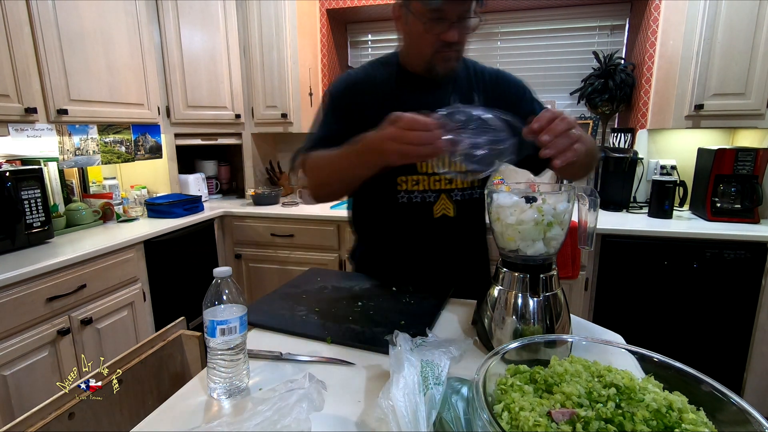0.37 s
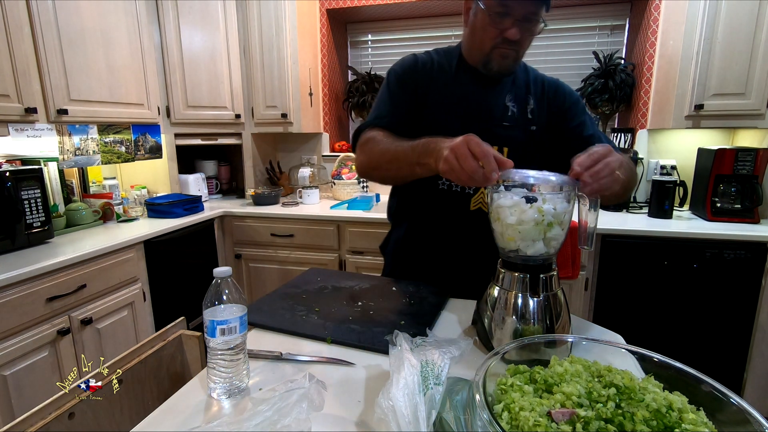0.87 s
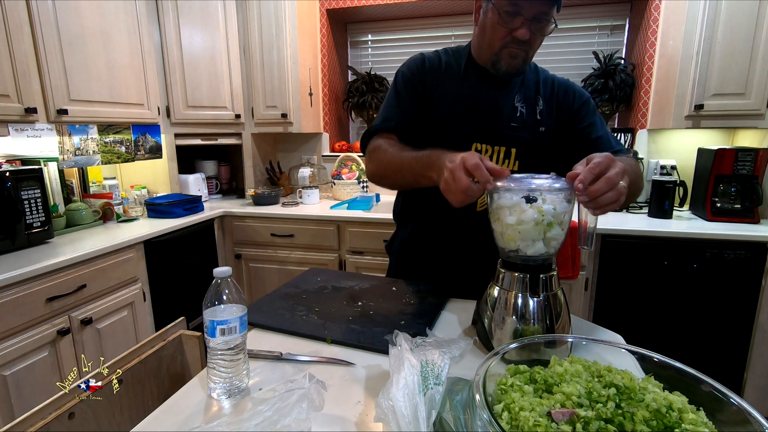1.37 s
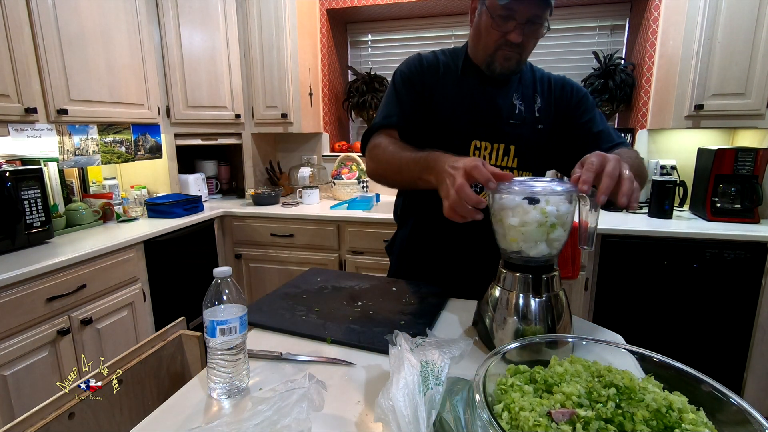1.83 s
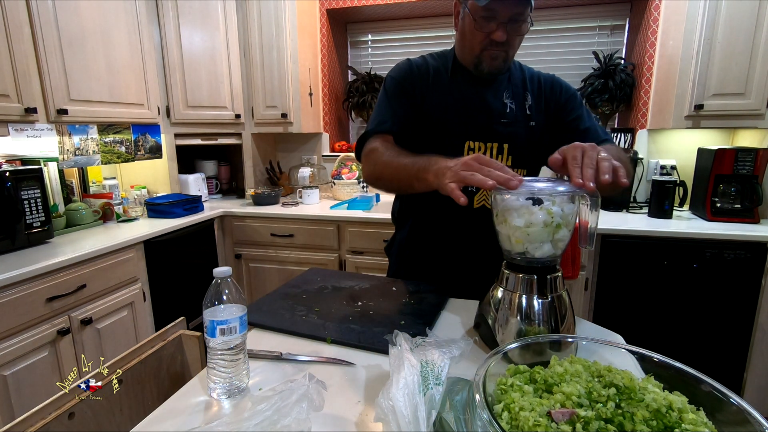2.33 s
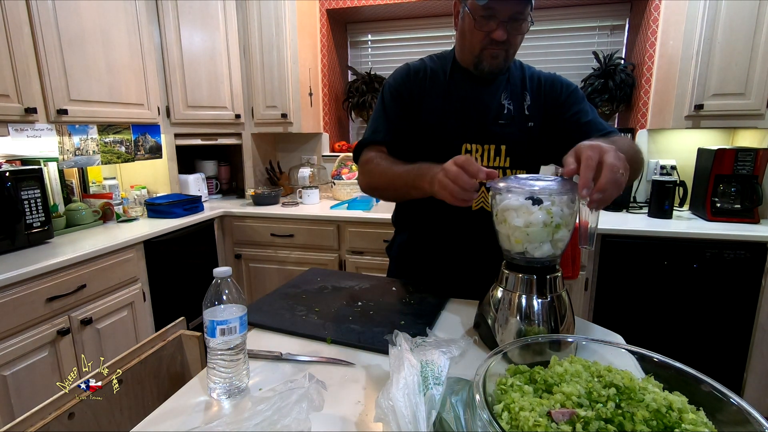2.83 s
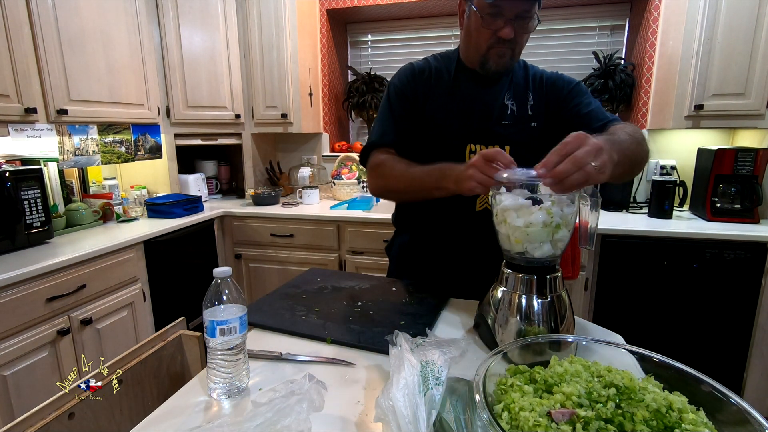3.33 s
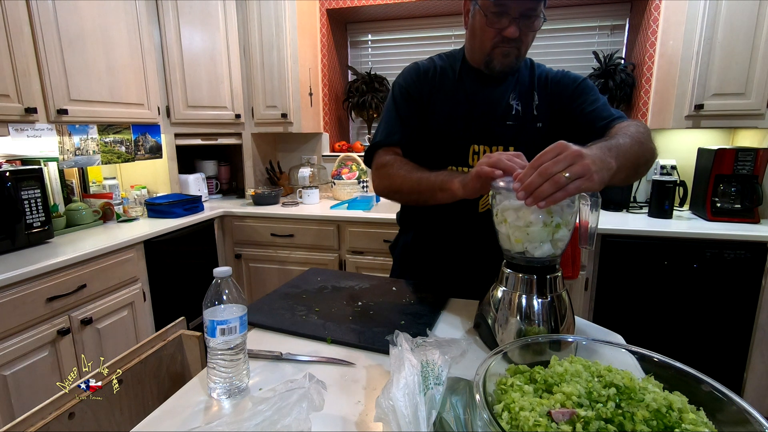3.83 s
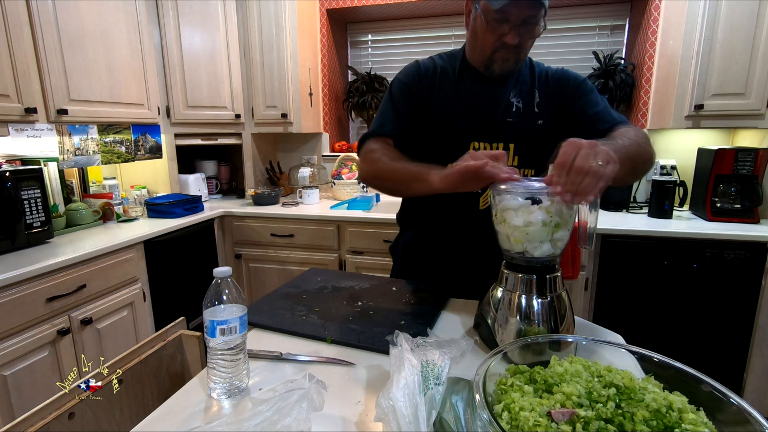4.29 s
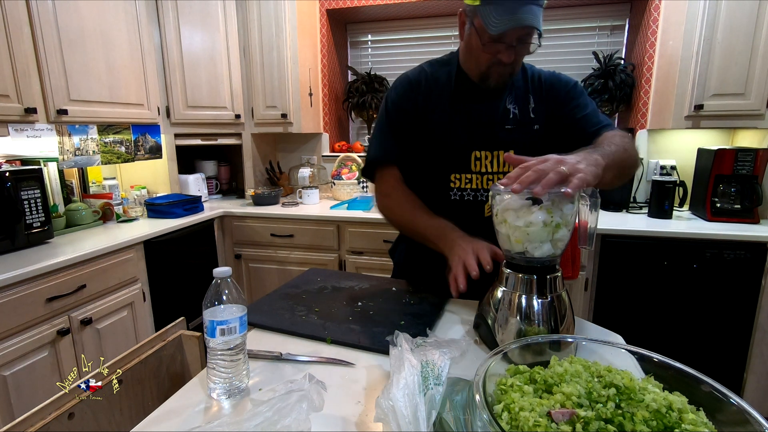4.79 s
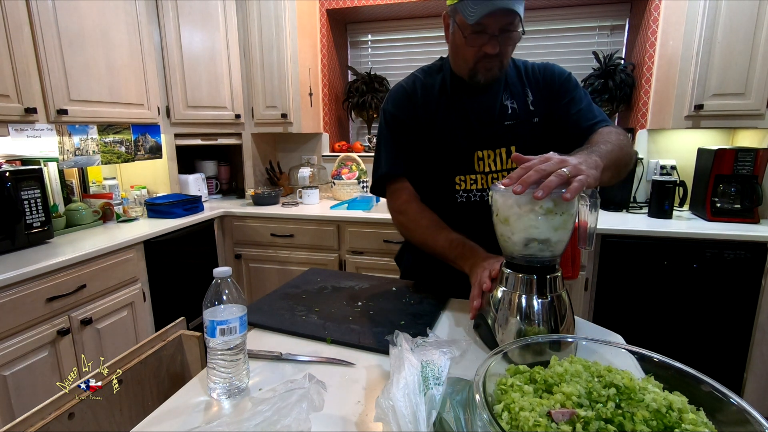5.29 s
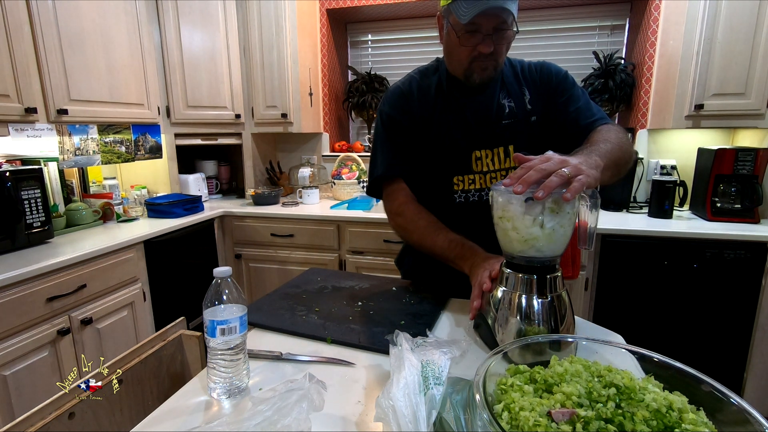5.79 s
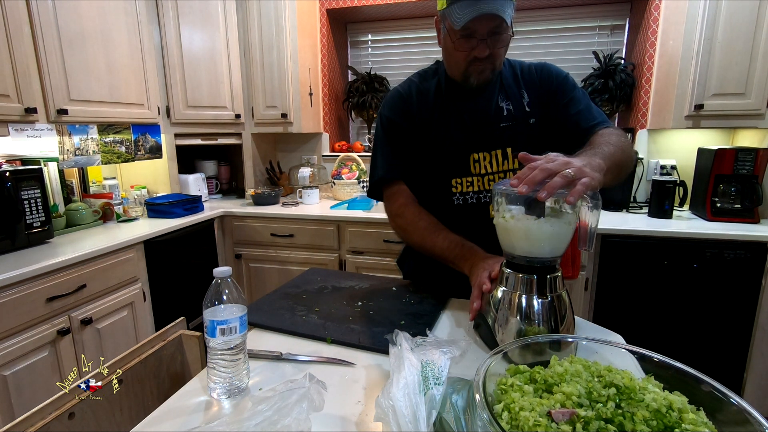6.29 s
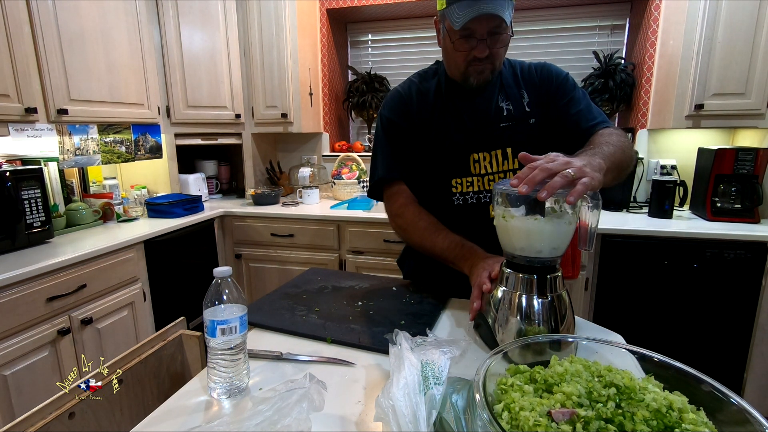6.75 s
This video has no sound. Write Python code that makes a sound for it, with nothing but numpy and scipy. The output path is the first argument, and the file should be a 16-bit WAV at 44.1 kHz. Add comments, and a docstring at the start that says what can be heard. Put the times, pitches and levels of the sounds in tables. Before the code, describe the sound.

In a reverberant home kitchen with a faint low hum, a hard plastic lid is knocked, slid and pressed onto a blender jar with uneven clacks and dull thuds. After about five seconds the motor spins up with a rising whine; onion chunks rumble against the jar, then it settles into a steady, hissy roar. The microphone is fairly close, with its deepest bass softened.

```python
"""A plastic lid is pressed and clicked onto a blender jar in a hard-walled kitchen, over a low hum.
Then the switch clicks, the motor spins up, onion pieces tumble against the jar and the roar settles.
Knocks are noise cracks plus ringing modes; scrapes, churn, hiss and room tone are filtered noise.
Pushes and tumbling pieces excite resonators, the motor and its whines are sines that follow a
turning speed, and fading noise supplies the kitchen's reflections."""
import sys
import numpy as np
from scipy import signal
from scipy.io import wavfile
from scipy.ndimage import uniform_filter1d

SR = 44100
rng = np.random.default_rng(int(sys.argv[2]) if len(sys.argv) > 2 else 0)


def gain_from_decibels(decibels):
    """Convert decibel values to linear amplitude factors."""
    exponent = np.asarray(decibels, float) / 20
    return 10 ** exponent


def digitize_waveform(pressure):
    """Quantize a signal to 16-bit integers and store it at the path in sys.argv[1].

    Rows of a 2-D input are taken as channels; values are limited to [-1, 1].
    """
    field = np.atleast_2d(pressure).T
    bounded = np.clip(field, -1, 1)
    quanta = np.round(bounded * 32767).astype(np.int16)
    wavfile.write(sys.argv[1], SR, quanta)


N = 314874  # length in samples

# Knocks of lid, jar and switch. Each row: start in seconds, relative level in dB, hollow part near
# 430 Hz and snap near 5 kHz in dB relative to that level, strongest ring in Hz.
KNOCKS = [(0.0, -35, -0.5, 7, 1890), (0.71, -22, -19, -7.5, 598), (0.72, -27.5, -3, -12, 2470),
          (0.7923, -26, -9.5, -12, 405), (0.893, -32.5, -4.5, -6.5, 2430), (0.974, -12, -1.5, -2, 2660),
          (1.2656, -23, -18, -15, 586), (1.2989, -18, -0.5, 7.5, 1880), (1.4636, -32.5, -2.5, -2, 420),
          (1.534, -17.5, -23, -8, 420), (1.604, -20.5, -18.5, -10, 427), (1.816, -25, -6, -9.5, 2250),
          (2.1586, -34.5, -8, -2.5, 420), (2.3253, -36.5, -8, 0, 1090), (2.4596, -12.5, -13.5, -13, 1440),
          (2.9528, -37, -16, 4, 1970), (3.003, -28, -10.5, -5, 2280), (3.0117, -50, -19, -22, 2270),
          (3.352, -48.5, 0, -34, 1080), (3.4596, -10.5, -12, -5.5, 1880), (3.6479, -23.5, -1.5, -7, 1310),
          (3.7252, -25, -1.5, 2.5, 1860), (3.915, -36.5, -1.5, -5, 420), (4.056, -29.5, -8, -12.5, 482),
          (4.259, -39.5, -7, 1.5, 1090), (4.312, -35, 1, 7, 416), (4.3773, -9, -22, -8, 930),
          (4.8206, -21.5, -10.5, -9, 1520), (5.21, -33, -7, -19, 420), (5.228, -28.5, 1, -8, 431)]
# Ringing modes of lid and jar. Each row: frequency in Hz, relative level in dB, 60 dB decay in seconds.
LID_MODES = [(190, -2, .1), (420, -3, .09), (585, -5, .07), (900, -2, .12), (1090, -4, .09),
             (1310, -4, .08), (1630, -4, .07), (1880, -3, .13), (2580, -4, .09), (3130, -6, .08),
             (3650, -5, .08), (4560, -6, .06)]
# Pushes of the palm that make the jar thud. Each row: start in seconds, relative level in dB.
PRESSES = [(0.0, -39), (1.531, -30), (2.3282, -35), (2.4612, -36.5), (2.6182, -41), (3.9809, -28.5),
           (4.8239, -30.5)]
# Lid sliding on board and rim. Each row: start in seconds, length in seconds, level in dB, centre in Hz.
SCRAPES = [(0.206, 0.038, -49, 1390), (0.712, 0.18, -50, 1280), (2.294, 0.24, -48.5, 1730),
           (2.755, 0.065, -50, 1310), (3.922, 0.11, -50, 1050), (4.287, 0.068, -36, 1820)]
# Jolts that reach the counter. Each row: start in seconds, relative level in dB.
BOOMS = [(0.981, -40), (1.302, -34), (1.535, -47), (3.463, -28.5), (4.0, -43), (4.379, -41), (4.827, -42),
         (5.248, -27.5), (5.62, -30)]
# Colour of the steady background. Each row: frequency in Hz, relative level in dB per Hz.
ROOM_TONE = [(40, -4), (110, -76), (190, -3), (320, -21.5), (1200, -21), (7500, -35), (12000, -50)]
# How alike the two sides are. Each row: frequency in Hz, likeness from -1 (opposite) to 1 (same).
LIKENESS = [(60, 0.34), (105, 0.92), (180, 0.98), (540, 0.78), (1100, -0.001), (2200, 0.65), (4800, 0.45),
            (14400, -0.87)]
# Balance of the sides. Each row: frequency in Hz, left over right in dB.
TILT = [(70, -5), (200, 0), (500, -2.4), (4000, -2.2), (12000, 2)]
# Fading of the kitchen's reflections. Each row: frequency in Hz, 60 dB decay in seconds.
KITCHEN = [(200, 0.29), (600, 0.56), (3000, 0.42), (8000, 0.37)]
# Colour of the churning food. Each row: frequency in Hz, relative level in dB per Hz.
CHURN = [(70, -7), (290, -6.5), (380, -3), (700, -9.5), (1100, 2.5), (2000, -7), (3500, -20.5)]
# Colour of the hiss. Each row: frequency in Hz, relative level in dB per Hz.
HISS = [(1000, -8.5), (2200, 12), (3800, 9.5), (5330, 3.5), (7540, -1.5), (10660, -17), (15000, -32)]
# Housing resonances in the hiss. Each row: frequency in Hz, width in Hz, level in dB relative to the hiss.
HOUSING = [(2213, 110, -11), (3035, 350, -4.5), (3810, 570, -2.5), (3880, 12, -16), (5690, 590, 0.5),
           (7050, 660, 0), (10300, 330, -14), (13700, 830, -16)]
# Motor over time. Each row: time in seconds, full speed in turns per second, unbalance tone in dB,
# overtones in dB.
MOTOR = [(5.56, 226, -51, -48), (5.7, 226, -36, -48), (6.1, 223.7, -30.5, -43.5), (6.45, 227, -31, -43.5),
         (6.52, 227.5, -31, -38.5), (7.14, 228, -30, -38)]
# Motor overtones. Each row: multiple of the turning speed, level in dB relative to the overtone level.
MOTOR_ORDERS = [(2, -3), (3, 0), (5, -2), (12, -4), (32, 4)]
# Tones of the second whine. Each row: multiple of its speed, base level in dB, loss in dB per halving
# of speed, change in dB per second.
WHINE_ORDERS = [(1, -20, 13, -12), (16, -26.5, 2, -5), (32, -25.5, 4.5, -11.5)]
# What the housing lets out of the second whine. Each row: frequency in Hz, gain in dB.
WHINE_PATH = [(70, -11), (135, -2.5), (165, -18.5), (800, 2), (2200, 1), (3200, -1.5), (3800, 4),
              (4500, -7), (5500, 4.5)]

EDGES = 35 * 2 ** np.arange(0, 9.2, .5)  # half-octave band edges in Hz
HUM_HZ, HUM_WIDTH_HZ, HUM_DB = 180, 22, -52.5
ROOM_TONE_DB = -54.5
BOUNCE_MIN_S, BOUNCE_MAX_S, BOUNCE_DB = .002, .02, -18.0  # delay span and loudest level of the chatter
DETUNE = .02  # each grip shifts the modes by about this share
RING_DB, FOCUS_DB = 3.5, 18.0  # gain of the modes, loss for those far from the touched spot
DIRECT_HZ = 5460  # the hands shade the treble of the direct knocks above this
COUNTER_HZ, COUNTER_T60_S = 75.3, 0.28
SWITCH_S, SPIN_UP_S = 5.22, .123  # switch time, time constant of the motor's run-up
CHURN_DB = -29.5
SURGE_DB, SURGE_S = -25, .1  # the churn surges as the blades first bite; time to peak
# Hiss at full speed; its loss in dB per halving of motor speed and of whine speed.
HISS_DB, HISS_MOTOR_DB, HISS_WHINE_DB = -25.5, 5.5, 1.7
# Big pieces, when they are gone, the step down in level, the change afterwards.
PIECES_DB, CHOPPED_S, CHOPPED_DB, FINER_DB_PER_S = -25, 5.49, -13.5, -2.5
# The second whine: top speed in turns per second, then time constants for speeding up and coasting.
WHINE_TOP, WHINE_UP_S, WHINE_COAST_S = 179, .146, .265
WHINE_LAG_S, WHINE_EASE_S = .015, .06  # start after the switch; span that smooths changes of speed
WHINE_OFF_S, WHINE_ON_S, WHINE_GONE_S = 5.765, 6.05, 6.24  # starts coasting, is driven again, fades out
COASTING_DB, AGAIN_DB, GONE_DB_PER_S = -3.0, -3.5, -120  # coasting hushes the high multiples most
# Motor whine: peak level, time of the peak, and how far from it the level is 3 dB down.
COMMUTATOR_DB, COMMUTATOR_S, COMMUTATOR_SPAN_S = -31, 5.52, .06


def rms_one(x):
    """Scale to an rms of 1."""
    return x / np.sqrt(np.mean(x ** 2) + 1e-20)


def in_time(rows):
    """Read a table's columns at every sample; outside the table they hold."""
    s, *columns = np.transpose(rows)
    return [np.interp(np.arange(N) / SR, s, column) for column in columns]


def at_hz(points, hz):
    """Read a table on a log-frequency axis."""
    table_hz, values = np.array(points).T
    return np.interp(np.log(hz), np.log(table_hz), values)


def drift(rate, size=N):
    """Smooth random wandering of rms about 1, slower for a lower rate in Hz."""
    r = np.exp(-80 * np.pi * rate / SR)  # one step every 40 samples
    steps = rng.standard_normal(size // 40 + 2002)
    slow = signal.lfilter([1], [1, -2 * r, r * r], steps)[2000:]
    return np.interp(np.arange(size) / 40, np.arange(len(slow)), rms_one(slow))


def ring(x, hz, t60):
    """A resonator: a unit click sets a dying sine of starting height 1 ringing."""
    r, w = gain_from_decibels(-60 / (t60 * SR)), 2 * np.pi * hz / SR
    return signal.lfilter([0, np.sin(w)], [1, -2 * r * np.cos(w), r * r], x + 1e-18)


def bands():
    """Half-octave filters with their centres in Hz."""
    return [(signal.butter(2, [low, high], "band", fs=SR, output="sos"), np.sqrt(low * high))
            for low, high in zip(EDGES, EDGES[1:])]


def side_gains(hz):
    """Left and right gains that tilt the stereo balance at this frequency."""
    return gain_from_decibels(at_hz(TILT, hz) * np.array([[.5], [-.5]]))


def stereo_noise(gain, size=N):
    """Noise built band by band, each with its own gain, likeness and balance."""
    out, white = 0, rng.standard_normal((2, 2, size))
    for k, (sos, hz) in enumerate(bands()):
        mid, side = signal.sosfilt(sos, white[k % 2])  # neighbouring bands use different noise
        alike = np.clip(at_hz(LIKENESS, hz), -1, 1)
        pair = np.sqrt(1 + alike) * mid + np.sqrt(1 - alike) * side * [[1], [-1]]
        out = out + gain(hz) * pair * side_gains(hz)
    return out


def coloured(spectrum, patchy_db, size=N):
    """Steady noise whose bands flicker a little; rms 1."""
    def gain(hz):
        return gain_from_decibels(at_hz(spectrum, hz) + patchy_db * drift(29.0, size))
    return rms_one(stereo_noise(gain, size))


def narrow(hz, width_hz, size=N):
    """Noise through one resonance, partly unlike on the two sides; rms about 1."""
    white = rng.standard_normal((3, size))
    alike = np.clip(at_hz(LIKENESS, hz), 0, 1)
    pair = np.sqrt(alike) * white[0] + np.sqrt(1 - alike) * white[1:]
    t60 = np.log(1000) / np.pi / width_hz  # a narrow resonance rings long
    return rms_one(ring(pair, hz, t60)) * side_gains(hz)


def tone(turns, multiple, level_db, wobble, flutter_db):
    """A sine locked to the shaft; the load jerks the shaft, which blurs the high multiples most."""
    phase = multiple * (2 * np.pi * np.cumsum(turns) / SR + wobble * drift(35))
    return np.sqrt(2) * gain_from_decibels(level_db + flutter_db * drift(18)) * np.sin(phase)


def room_tone():
    """Steady coloured noise, with an appliance hum made of noise through one narrow resonance."""
    highpass = signal.butter(2, 140, "high", fs=SR, output="sos")
    hum = signal.sosfilt(highpass, narrow(HUM_HZ, HUM_WIDTH_HZ))
    return gain_from_decibels(ROOM_TONE_DB) * coloured(ROOM_TONE, 0.66) + gain_from_decibels(HUM_DB) * hum


def presses(soft_s=0.0003):
    """The palm's soft push sounds only the lowest mode, as a thud."""
    s, level_db = np.transpose(PRESSES)
    push, fade = np.zeros(N), np.exp(-1 / (soft_s * SR))
    push[np.round(s * SR).astype(int)] = gain_from_decibels(level_db + 3.5)
    softened = signal.lfilter([1 - fade], [1, -fade], push)
    lowest_hz, _, lowest_t60 = LID_MODES[0]
    return ring(softened, lowest_hz, lowest_t60)


def knocks(crack_s=0.0042, crack_db=7.0, spot_db=8.5, top_db=-8.0, thud_db=-23.5):
    """A contact gives a short crack, fullest near its ring, and strikes modes near the touched spot most."""
    # The loose lid chatters: each knock is followed by three quieter bounces.
    s, level_db, hollow_db, snap_db, ring_hz = np.repeat(KNOCKS, 4, axis=0).T
    luck, bounce = rng.random((len(s), 2)), np.arange(len(s)) % 4 > 0
    late = bounce * (BOUNCE_MIN_S + (BOUNCE_MAX_S - BOUNCE_MIN_S) * luck[:, 0])
    level_db = level_db + bounce * (BOUNCE_DB - 8 * luck[:, 1])
    at = np.round((s + late) * SR).astype(int)
    spread_db = rng.normal(0, 2.5, (len(s), len(LID_MODES)))
    # Each knock's colour, given at five frequencies.
    colour = np.array([0 * s + thud_db, hollow_db, 0 * s - 8, snap_db, snap_db + top_db])
    places = np.log([180, 430, 1700, 5000, 11000])

    def clicks(hz, extra_db):
        """Impulses with each knock's strength at this pitch."""
        train = np.zeros(N)
        colour_db = np.array([np.interp(np.log(hz), places, c) for c in colour.T])
        train[at] = gain_from_decibels(level_db + colour_db + extra_db)
        return train

    cracks, rough = np.zeros(N), rng.standard_normal(N)
    fade = np.exp(-1 / (crack_s * SR))
    for k, (sos, hz) in enumerate(bands()[5:]):
        octaves_off = np.minimum(abs(np.log2(hz / ring_hz)), 1)
        train = clicks(hz, crack_db - spot_db * octaves_off) * np.sqrt(1700 / hz)
        burst = rough * signal.lfilter([1], [1, -fade], train)
        # signs alternate so that neighbouring bands add up
        cracks += (-1) ** k * signal.sosfilt(sos, 0.99 * train + 3.13 * burst + 1e-18)

    shift = 1 + DETUNE * rng.standard_normal((len(KNOCKS), len(LID_MODES)))
    shift = np.repeat(shift, 4, axis=0)  # bounces keep their knock's tuning
    t, rings = np.arange(SR // 4) / SR, np.zeros(N + SR)
    for k, (hz, mode_db, t60) in enumerate(LID_MODES):
        off = np.minimum(abs(np.log2(hz / ring_hz)) * 5.0, 1)  # full loss a fifth of an octave away
        strength = clicks(hz, RING_DB + mode_db - FOCUS_DB * off + spread_db[:, k])[at]
        for i, size, pitch in zip(at, strength, hz * shift[:, k]):
            rings[i:i + len(t)] += size * gain_from_decibels(-60 * t / t60) * np.sin(2 * np.pi * pitch * t)
    return cracks + rings[:N]


def kitchen(x, gap_s=.01):
    """Wall reflections, as noise that fills in after a few milliseconds and dies away band by band."""
    t = np.arange(SR) / SR
    tail = stereo_noise(lambda hz: gain_from_decibels(-60 * t / at_hz(KITCHEN, hz)), size=SR)
    tail = tail * (1 - np.exp(-t / gap_s))
    tail = tail / np.sqrt(np.sum(tail ** 2) / 2)
    return signal.fftconvolve(x[None], tail, axes=1)[:, :N]


def scrapes():
    """Grainy friction noise that swells and stops, broad around its centre."""
    out, t = np.zeros(N), np.arange(N) / SR
    grit = rng.standard_normal(N) * gain_from_decibels(4 * drift(60))
    for s, length, level_db, hz in SCRAPES:
        stroke = np.sqrt(np.clip(1 - (2 * (t - s) / length - 1) ** 2, 0, 1))
        band = signal.butter(2, [hz / 1.83, hz * 1.73], "band", fs=SR)
        out += gain_from_decibels(level_db) * stroke * rms_one(signal.lfilter(*band, grit))
    return out


def counter():
    """The counter booms after a push; two resonators in a row make it swell late, unlike on the sides."""
    s, level_db = np.transpose(BOOMS)
    push = np.zeros(N)
    push[np.round(s * SR).astype(int)] = gain_from_decibels(level_db)
    boom = ring(ring(push, COUNTER_HZ, COUNTER_T60_S), COUNTER_HZ, 0.35)
    return boom / boom.max() * push.max() * [[-.5], [1.4]]


def motor_speed():
    """Turns per second, closing in on full speed after the switch."""
    since = np.maximum(np.arange(N) / SR - SWITCH_S, 1e-3)
    return in_time(MOTOR)[0] * (1 - np.exp(-since / SPIN_UP_S))


def motor():
    """The unbalanced shaft's tone and its overtones: clean lines."""
    turns, (_, base_db, over_db) = motor_speed(), in_time(MOTOR)
    unbalance = tone(turns, 1, base_db, .03, 2.2)
    return unbalance + sum(tone(turns, k, over_db + db, 0.022, 2) for k, db in MOTOR_ORDERS)


def whine_speed():
    """Turns per second: driven towards the top, left to coast, driven again."""
    t = np.arange(N) / SR
    start = SWITCH_S + WHINE_LAG_S
    driven_s = np.clip(t, start + 1e-3, WHINE_OFF_S) - start
    first = WHINE_TOP * (1 - np.exp(-driven_s / WHINE_UP_S))
    coasting_s = np.clip(t, WHINE_OFF_S, WHINE_ON_S) - WHINE_OFF_S
    coasted = first * np.exp(-coasting_s / WHINE_COAST_S)
    again_s = np.maximum(t - WHINE_ON_S, 0)
    turns = WHINE_TOP - (WHINE_TOP - coasted) * np.exp(-again_s / WHINE_UP_S)
    return uniform_filter1d(turns, round(WHINE_EASE_S * SR))


def whines():
    """The motor's sixteenth multiple and a second, wandering whine: sines with strong jitter and flutter."""
    t, turns = np.arange(N) / SR, whine_speed()
    coasting = (t > WHINE_OFF_S) & (t < WHINE_ON_S)
    state_db = AGAIN_DB * (t > WHINE_ON_S) + GONE_DB_PER_S * np.maximum(t - WHINE_GONE_S, 0)
    wandering = 0
    for k, base_db, loss_db, fading_db in WHINE_ORDERS:
        k = round(k)
        level_db = base_db + loss_db * np.log2(turns / WHINE_TOP) + fading_db * (t - SWITCH_S)
        level_db = level_db + state_db + COASTING_DB * (k / 16) ** 1.9 * coasting
        level_db = level_db + at_hz(WHINE_PATH, k * turns)
        wandering = wandering + tone(turns, k, level_db, .09, 2.8)
    commutator_db = COMMUTATOR_DB - 3 * ((t - COMMUTATOR_S) / COMMUTATOR_SPAN_S) ** 2
    return wandering * (t > SWITCH_S) + tone(motor_speed(), 16, commutator_db, .09, 3)


def blending(beat=0.082, pieces_per_s=400, bite_s=0.18):
    """Churn and hiss throb once a turn, the hiss follows speed; onion pieces knock the jar at random."""
    start = round(SWITCH_S * SR)
    size = N - start
    t, turns = np.arange(size) / SR, motor_speed()[start:]
    throb = 1 + beat * np.sin(2 * np.pi * np.cumsum(turns) / SR)

    rising = 1 - np.exp(-t / bite_s)
    surge = (t / SURGE_S * np.exp(1 - t / SURGE_S)) ** 2
    churn_level = rising * gain_from_decibels(CHURN_DB) + gain_from_decibels(SURGE_DB) * surge
    churn = churn_level * coloured(CHURN, 0.35, size)

    motor_share = np.maximum(turns / turns.max(), .3)
    whine_share = np.maximum(whine_speed()[start:] / WHINE_TOP, .3)
    hiss_db = HISS_DB + HISS_MOTOR_DB * np.log2(motor_share) + HISS_WHINE_DB * np.log2(whine_share)
    hiss = coloured(HISS, 1.0, size)
    hiss = hiss + sum(gain_from_decibels(db) * narrow(hz, width, size) for hz, width, db in HOUSING)

    after = t + SWITCH_S - CHOPPED_S
    step_db = CHOPPED_DB * np.clip(after / 0.0089, 0, 1)
    pieces_db = PIECES_DB + step_db + FINER_DB_PER_S * np.maximum(after, 0)
    hits = (rng.random(size) < pieces_per_s / SR) * rng.standard_normal(size)
    pieces = rms_one(ring(hits, 380, 0.15) + ring(hits, 426.0, 0.16))

    out = np.zeros((2, N))
    out[:, start:] = throb * (churn + gain_from_decibels(hiss_db) * hiss) + rising * gain_from_decibels(pieces_db) * pieces
    return out


def scene():
    """Mix all sources: the direct knocks, thuds and motor tones lie slightly right, with reflections."""
    thuds, hits, whine = presses(), knocks() + scrapes(), whines()
    running = np.arange(N) > SWITCH_S * SR
    shaded = signal.lfilter(*signal.butter(1, DIRECT_HZ, fs=SR), hits)
    near = (shaded + thuds + whine + motor() * running) * gain_from_decibels([[-1.2], [1.2]])
    reflected = kitchen(gain_from_decibels(-1.5) * hits + thuds + whine / 2)
    return near + reflected + counter() + room_tone() + blending()


def low_pass(x):
    """Removes everything above the highest recorded frequency."""
    return signal.sosfilt(signal.butter(12, 14970, fs=SR, output="sos"), x)


def record(dry, low_hz=65, high_hz=8500):
    """The microphone loses the deep bass and the top octave."""
    heard = signal.sosfilt(signal.butter(3, low_hz, "high", fs=SR, output="sos"), dry)
    heard = signal.sosfilt(signal.butter(3, high_hz, fs=SR, output="sos"), heard)
    return low_pass(heard)


dry = scene()
out = record(dry)
digitize_waveform(out)
```